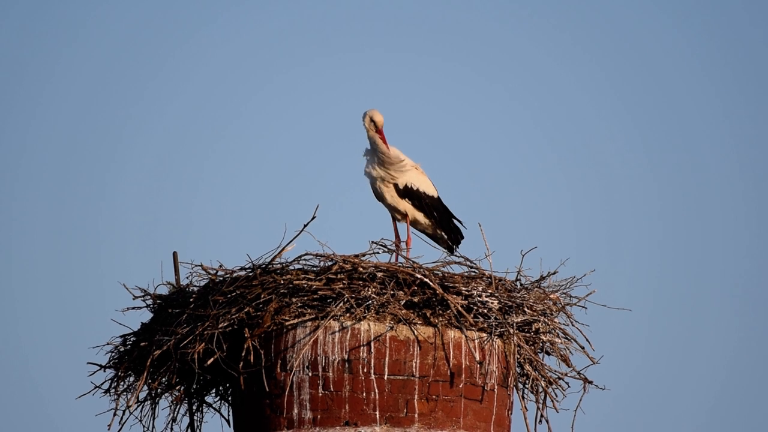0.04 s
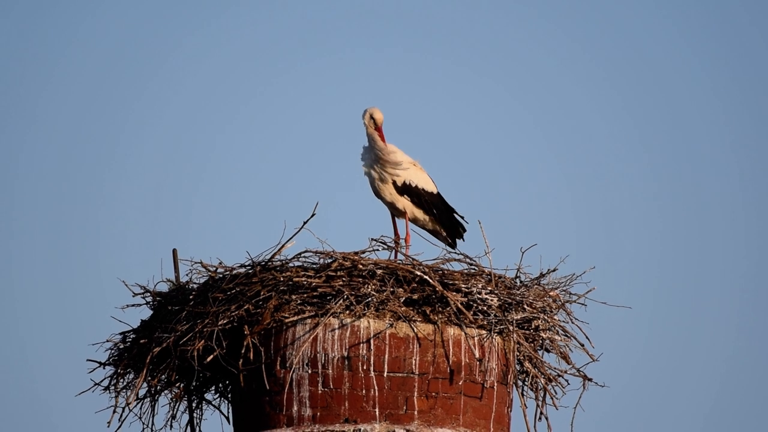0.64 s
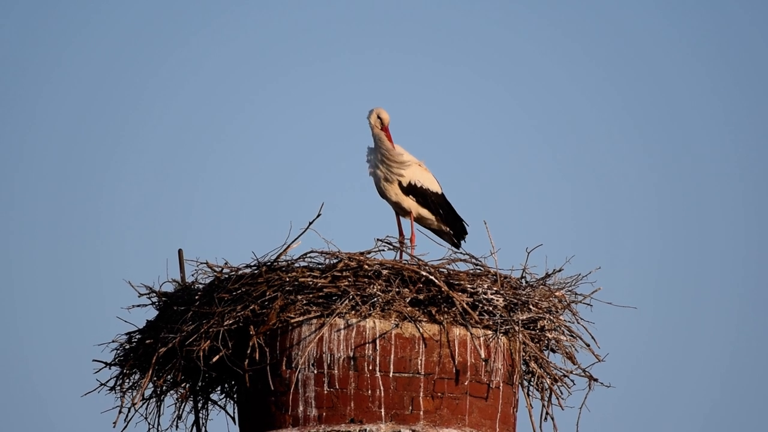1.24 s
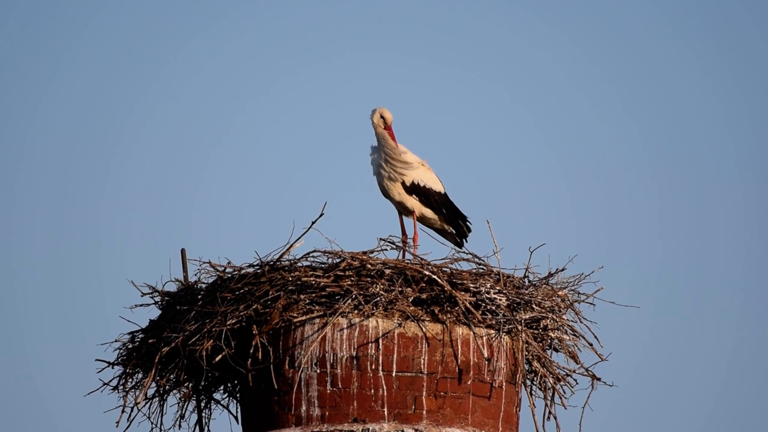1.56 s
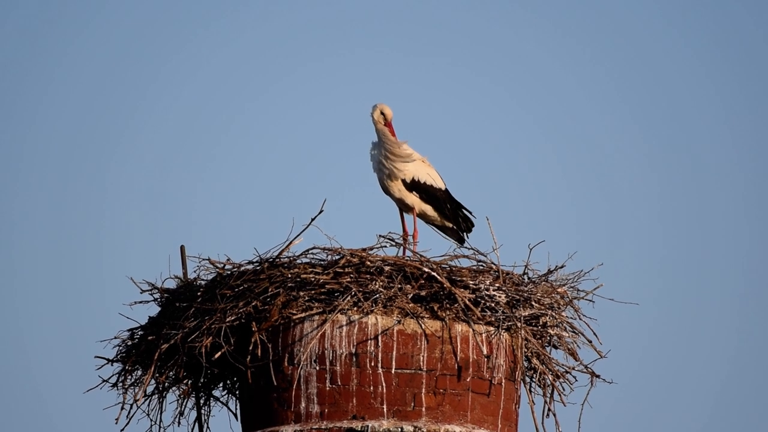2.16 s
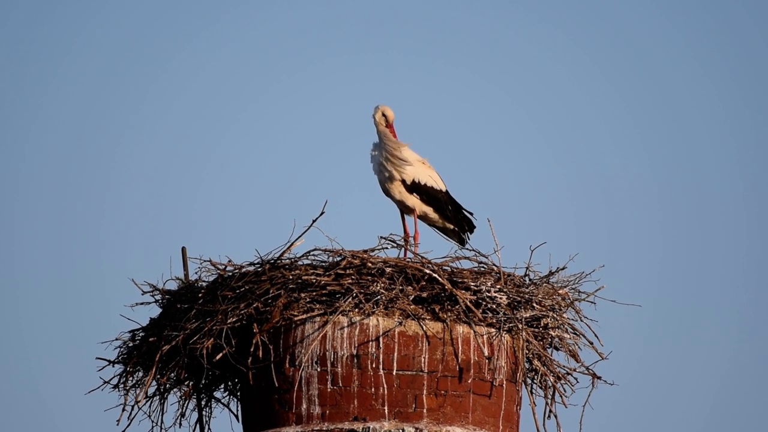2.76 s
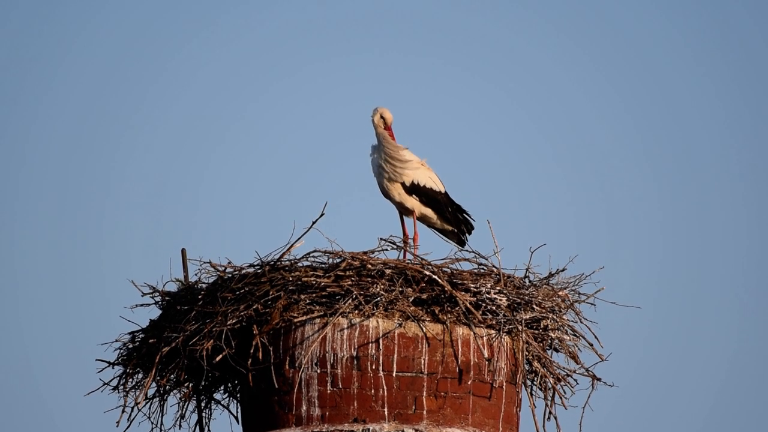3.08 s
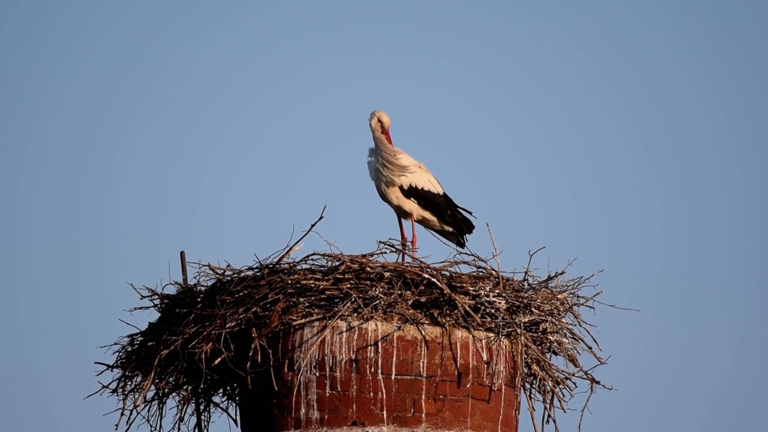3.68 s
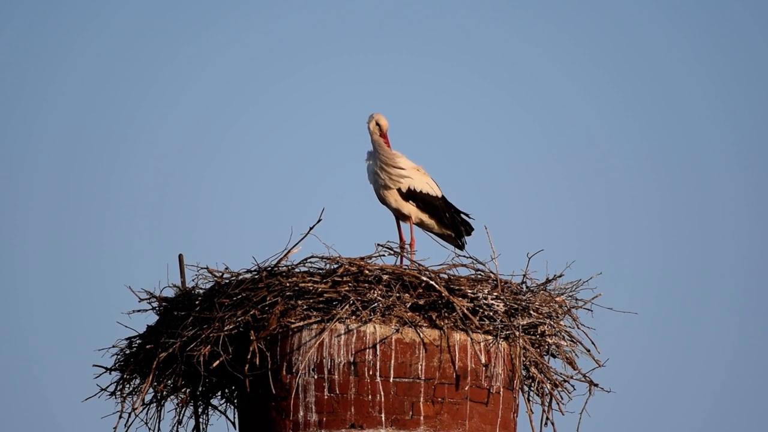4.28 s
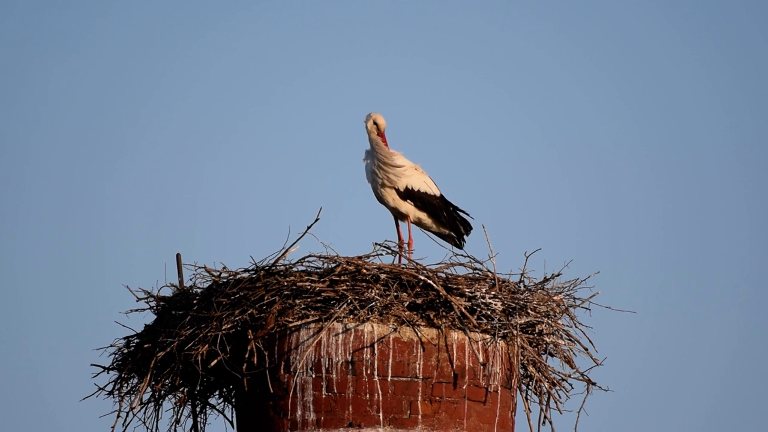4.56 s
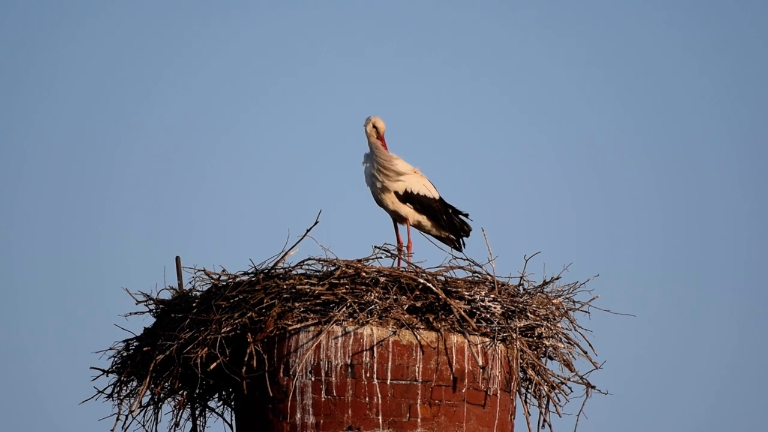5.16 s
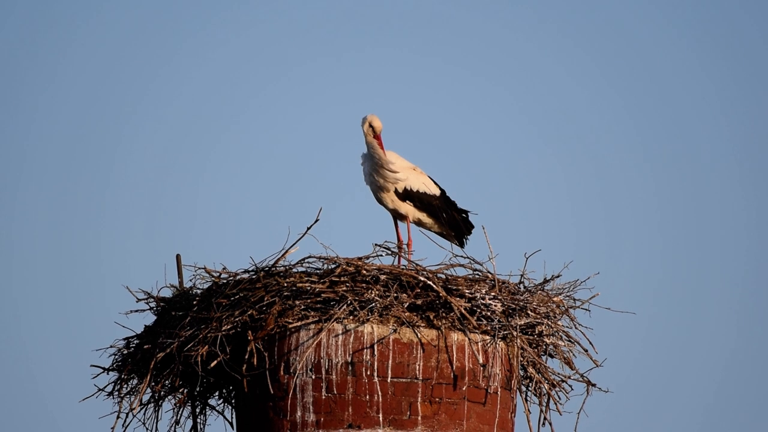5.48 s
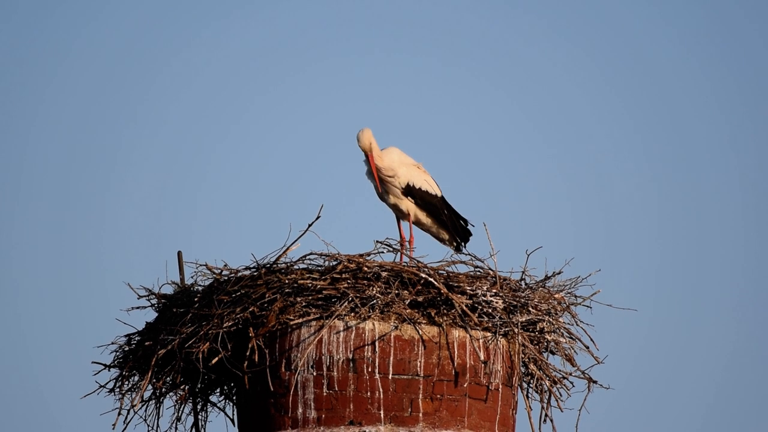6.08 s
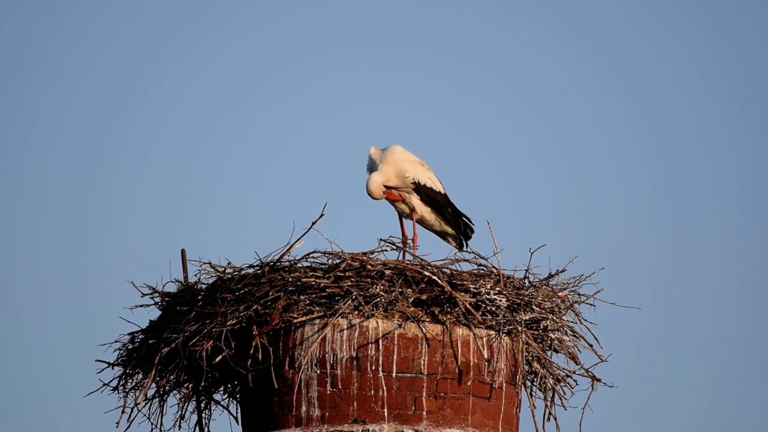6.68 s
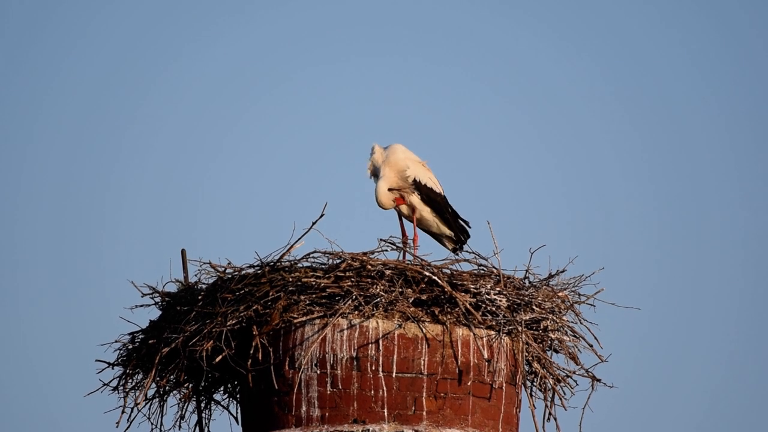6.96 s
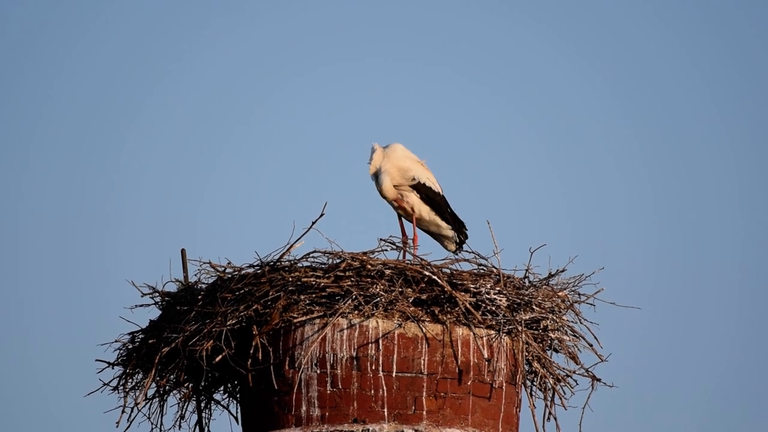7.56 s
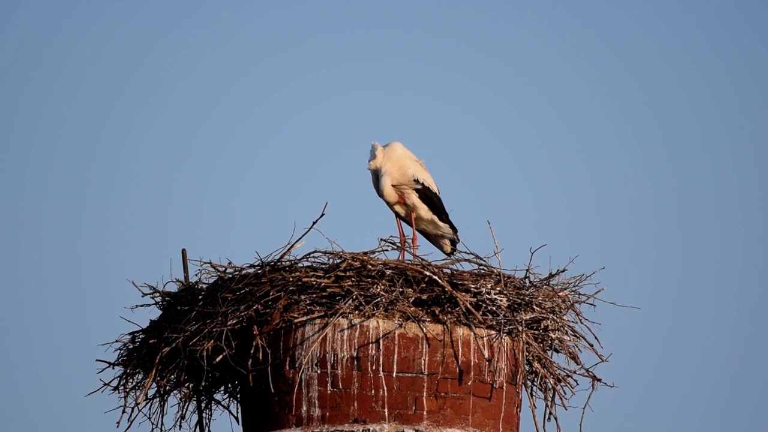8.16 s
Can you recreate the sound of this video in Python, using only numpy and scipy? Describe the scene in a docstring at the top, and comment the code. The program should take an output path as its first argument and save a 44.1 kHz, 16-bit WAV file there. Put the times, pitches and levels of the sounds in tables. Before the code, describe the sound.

Lumpy wind rumble hits the microphone outdoors and dies away as cars swell on a far-off road.

```python
"""Open air on a breezy day, heard from a stereo camera that stands still.
Gusts buffet the microphone in lumpy flutters and die away; the hardest eddies overload it.
Tyres roar on a distant road, swelling as cars go by. Close up, cloth rustles, ticks and squeaks once
as its fibres catch and slip. Leaves sigh in the breeze and a small bird whistles faintly,
over the thin hiss and whine of the camera's electronics."""
import sys
import numpy as np
from scipy import signal
from scipy.fft import rfft, irfft
from scipy.io import wavfile
from scipy.ndimage import uniform_filter1d

SR = 44100
rng = np.random.default_rng(int(sys.argv[2]) if len(sys.argv) > 2 else 0)


def output_pcm(signal):
    """Save a mono or channel-first signal as 16-bit PCM at the path in sys.argv[1].

    Samples are clipped to [-1, 1] before scaling.
    """
    pcm = np.clip(np.atleast_2d(signal).T, -1, 1) * 32767
    wavfile.write(sys.argv[1], SR, np.round(pcm).astype(np.int16))


N = 371763
T = np.arange(N) / SR
ALL_HZ = np.fft.rfftfreq(N, 1 / SR)
FRAME, HOP = 512, 128  # samples, for the moving filters
FRAME_S = np.arange(N // HOP + 3)[:, None] * HOP / SR
BIN_HZ = np.fft.rfftfreq(FRAME, 1 / SR)

# Gusts at the microphone. Each row: peak time in seconds, strength in dB, rise and fall in seconds.
WIND_GUSTS = [(.11, -36, 0.076, 0.15), (.313, -27.5, 0.054, .015), (.368, -21, 0.046, 0.12),
              (.76, -27.5, 0.094, 0.13), (0.819, -15, 0.036, 0.092), (0.916, -18, 0.047, 0.11),
              (1.03, -29.5, .05, 0.062), (1.3, -44, 0.28, 0.23), (1.73, -34.5, .21, 0.29),
              (2.0, -35, 0.076, 0.21), (2.25, -34.5, 0.15, 0.36), (2.598, -38.5, 0.036, .03),
              (2.72, -29, 0.047, 0.036), (2.97, -45.5, .05, 0.14), (3.52, -36.5, 0.065, 0.12),
              (3.66, -29.5, 0.16, .11), (4.075, -26, 0.091, 0.1), (4.2, -34, 0.04, 0.023),
              (4.39, -28, 0.11, .12), (4.585, -33, 0.052, 0.023), (4.82, -38.5, 0.66, 0.75),
              (5.1, -37.5, 0.19, 0.19), (5.43, -40.5, 0.18, 0.28)]
# The hardest eddies. Each row: time in seconds, relative level in dB, centre in Hz.
HARD_EDDIES = [(0.314, -12, 179), (.322, -5.5, 424), (.355, -10, 605), (0.368, -7, 870), (.805, 1.5, 930),
               (.808, 3.5, 660), (.830, 7.5, 883), (0.8481, 1.5, 566), (0.927, -8, 620), (0.964, -6, 358),
               (1.889, -19.5, 264), (2.244, -17, 384), (2.6, -25, 160), (2.725, -8, 590),
               (3.533, -17.5, 487), (3.656, -15.5, 403), (4.062, -5.5, 445), (4.0745, -7.5, 644),
               (4.317, -17.5, 550), (4.351, -12, 636), (4.426, -7.5, 620), (4.923, -19.5, 259),
               (5.29, -21, 403)]
# Colour of the buffeting. Each row: frequency in Hz, relative level in dB.
BUFFET_COLOUR = [(20, -23), (45, -9), (90, -1.5), (140, 1.5), (200, 0.5), (330, -4.5), (700, -1),
                 (1500, -6), (4000, -41)]
# Swells of the road, as cars pass or the breeze carries them. Each row: peak time in seconds,
# level in dB, half width in seconds, drive of the body EQ in dB, drive of the treble EQ in dB.
ROAD_SWELLS = [(0.044, -35, 0.093, 2.5, -4), (0.477, -37.5, 0.81, 1.5, 8), (1.083, -32, .11, -7, 2),
               (1.735, -37, 0.49, -1.5, 3), (2.46, -40.5, .5, -8.5, -4.5), (6.193, -29.5, 0.79, -5.5, -5),
               (7, -33, 0.58, 5, 5), (7.64, -35, 0.32, 8.5, 4.5), (8.35, -33, 0.66, 2.5, 2)]
# Colour of the distant tyres. Each row: frequency in Hz, relative level in dB.
TYRE_COLOUR = [(20, -62), (200, -24.5), (300, -17.5), (450, -10), (700, -5), (1000, 1), (1350, -1.5),
               (1800, -6.5), (2400, -15.5), (3500, -25), (5000, -33.5), (7000, -44), (16000, -60)]
# Colour of the rumble under the road. Each row: frequency in Hz, relative level in dB.
RUMBLE_COLOUR = [(10, 7), (30, -26), (60, 3), (100, 1.5), (170, -1.5), (280, -9), (600, -16), (2000, -58)]
# Strokes of cloth. Each row: peak time in seconds, relative level in dB, half width in seconds.
CLOTH_STROKES = [(3.252, -51.5, .026), (3.305, -54, .012), (3.462, -60, 0.058), (3.615, -59, 0.042),
                 (3.71, -46.5, 0.015), (3.765, -51.5, 0.043), (3.86, -59.5, .04), (3.974, -55.5, .03),
                 (4.25, -53, 0.02), (4.523, -59, 0.036), (4.67, -60, 0.024), (4.83, -56.5, 0.053),
                 (4.905, -51.5, 0.017), (4.977, -57, 0.016), (5.033, -53.5, 0.013), (6.237, -58, 0.03)]
# Colour of rubbing fibres. Each row: frequency in Hz, relative level in dB.
CLOTH_COLOUR = [(200, -24), (1200, -9), (3000, 12), (4300, 7), (6000, 2.5), (9500, 0.5), (12000, -4.5),
                (16000, -18)]
# Tiny clicks. Each row: time in seconds, relative level in dB, half width in seconds,
# low and high band edges in Hz.
CLOTH_TICKS = [(2.579, -51, 0.001, 2500, 10500), (4.525, -56, .002, 5000, 8500),
               (4.551, -59, .0015, 5000, 12000), (5.897, -51, 0.00081, 8000, 11500)]
# Sighs of leaves. Each row: peak time in seconds, relative level in dB, half width in seconds,
# centre in Hz.
LEAF_SIGHS = [(.53, -66.5, .16, 9000), (1.077, -68.5, 0.13, 8400), (2.25, -74, .1, 8500),
              (2.56, -66, .07, 3400), (2.98, -73, .05, 10500), (5.676, -63, 0.035, 5500),
              (7.038, -66.5, .14, 9000), (7.598, -72, 0.11, 8500)]
# Calls of a small bird. Each row: peak time in seconds, level in dB, pitch in Hz.
BIRD_CALLS = [(5.525, -65, 7250), (6.19, -68, 7200)]
# Colour of the hiss of leaves and microphone. Each row: frequency in Hz, relative level in dB.
HISS_COLOUR = [(20, -16), (2000, -4), (5000, 2.5), (8000, 1.5), (10500, -1.5), (13000, -7), (16000, -13)]
# Stereo image of diffuse sound. Each row: frequency in Hz, left-right likeness from 0 (wide) to 1 (mono).
STEREO_LIKENESS = [(30, 1), (300, 0.99), (800, 0.99), (1600, .98), (2500, 0.85), (4000, 0.84), (6000, 0.38),
                   (10000, 0.17), (15000, .05)]


def wind(flow_db=5.5, eddy_db=-1, lee_flutter_db=-11, lee_hz=420):
    """The right port faces the wind; the left, in the lee, gets it later and duller, plus its own flutter."""
    strength_db = gust_strength()
    windward = gain_of(flow_db) * turbulence(strength_db) + gain_of(eddy_db) * eddies()
    sheltered = windward + gain_of(flow_db + lee_flutter_db) * turbulence(strength_db)
    return np.array([filtered(sheltered, 1 / (1 + 1j * ALL_HZ / lee_hz)), windward])


def gust_strength(lull_db=-70, drop_db=12.5, roundness=1.34, flutter_db=1.0, flutter_hz=23):
    """Wind strength in dB: each gust builds and dies away over a light breeze, and the flow flutters."""
    power = gain_of(lull_db) ** 2
    for s, db, rise, fall in WIND_GUSTS:
        away = np.maximum((s - T) / rise, (T - s) / fall)
        power = power + gain_of(db - drop_db * np.minimum(away, 10) ** roundness) ** 2
    return 10 * np.log10(power) + flutter_db * wander(flutter_hz)


def turbulence(strength_db, lumpy_db=4.0, lump_hz=110, corner_hz=900, strong_db=-22, brightening=0.59):
    """Pressure comes in lumps; faster wind carries smaller eddies, so its whole band moves up in pitch."""
    lumps = evened(rng.standard_normal(N) * gain_of(lumpy_db * wander(lump_hz)))
    flow = evened(filtered(lumps, gain_of(curve_at(BUFFET_COLOUR, ALL_HZ)))) * gain_of(strength_db)
    excess_db = np.interp(FRAME_S, T, strength_db) - strong_db
    ratio = BIN_HZ / (corner_hz * gain_of(brightening * excess_db))
    low_cut = ratio / np.hypot(ratio, 0.29)
    return swept(flow, low_cut / np.hypot(1, ratio ** 2.3))


def eddies(half_cycles=0.36):
    """Each hard eddy is one short push and pull of pressure."""
    out = np.zeros(N)
    phases = rng.uniform(0, 2 * np.pi, len(HARD_EDDIES))
    for (s, db, hz), phase in zip(HARD_EDDIES, phases):
        out += gain_of(db) * bump(s, half_cycles / hz) * np.cos(2 * np.pi * hz * (T - s) + phase)
    return out


def road(rumble_db=-54.5, waver_db=0.49, shimmer_db=1.0):
    """Tyre roar, dulled by distance and wavering in the moving air, over a steady rumble."""
    level_db, body_db, treble_db = traffic(FRAME_S)
    body_eq = curve_at([(250, -0.25), (450, 0.82), (950, 0.72), (1400, 0.096), (2400, -0.071)], BIN_HZ)
    treble_eq = curve_at([(1600, 0.0056), (3000, 1)], BIN_HZ)
    tone_db = body_db * body_eq + treble_db * treble_eq
    # Soft random patches in time and frequency make the roar shimmer.
    patches = uniform_filter1d(rng.standard_normal(tone_db.shape), size=40, axis=0)
    patches = evened(uniform_filter1d(patches, size=4, axis=1))
    tyres = stereo_noise(TYRE_COLOUR, curve_at(STEREO_LIKENESS, ALL_HZ))
    roar = swept(tyres, gain_of(level_db + tone_db + shimmer_db * patches))
    roar *= gain_of(waver_db * wander(hz=15))
    return roar + gain_of(rumble_db) * stereo_noise(RUMBLE_COLOUR, likeness=0.98)


def traffic(t, steady_db=-38.5):
    """Swells add in power to the steady traffic farther off; body and treble are mixed by each swell's share of
    the power."""
    s, db, half, body_db, treble_db = np.transpose(ROAD_SWELLS)
    power = (gain_of(db) / (1 + ((t - s) / half) ** 2)) ** 2
    total = power.sum(1) + gain_of(steady_db) ** 2
    return np.array([10 * np.log10(total), power @ body_db / total, power @ treble_db / total])[..., None]


def cloth(grain_db=1.5, grain_hz=250, bright_hz=7500, firm_db=-48, brightening=0.27):
    """Fibres catch and slip under each stroke; a firmer stroke is brighter."""
    strokes = np.sqrt(sum((gain_of(db) * bump(s, half)) ** 2 for s, db, half in CLOTH_STROKES))
    fibres = evened(stereo_noise(CLOTH_COLOUR, likeness=0.77) * gain_of(grain_db * wander(grain_hz)))
    dull = filtered(fibres, 1 / (1 + (ALL_HZ / bright_hz) ** 4))
    brightness = (strokes / gain_of(firm_db)) ** brightening
    return strokes * (dull + (fibres - dull) * brightness)


def squeak(peak_s=3.26, db=-30, half_s=.006, hz=1460):
    """For a moment the slipping fibres fall into step: a rough tone with a falling pitch."""
    pitch_hz = hz * (1 - 9 * np.clip(T - peak_s, -.03, .03) + .025 * wander(hz=400))
    turns = np.cumsum(pitch_hz) / SR
    tone = sum(gain_of(partial_db) * np.sin(2 * np.pi * harmonic * turns)
               for harmonic, partial_db in enumerate([0, -15, -15], start=1))
    return gain_of(db) * bump(peak_s, half_s) * tone


def ticks():
    """Dry little clicks, each a pinch of noise in its own treble band."""
    out = np.zeros(N)
    for s, db, half, low_hz, high_hz in CLOTH_TICKS:
        slope = (ALL_HZ / low_hz) ** 6
        band = slope / np.hypot(1, slope) / np.hypot(1, (ALL_HZ / high_hz) ** 6)
        out += gain_of(db) * bump(s, half) * evened(filtered(rng.standard_normal(N), band))
    return out


def leaves(octaves=0.36):
    """The breeze stirs the leaves: each sigh is a smooth swell of hiss in its own band."""
    hiss = stereo_noise(HISS_COLOUR, likeness=0.85)
    out = np.zeros((2, N))
    for s, db, half, hz in LEAF_SIGHS:
        band = np.exp(-(np.log2((ALL_HZ + 1) / hz) / octaves) ** 2 / 2)
        out += gain_of(db) * bump(s, half) * evened(filtered(hiss, band))
    return out


def bird(half_s=.012, fall_hz_per_s=20000):
    """Each call is a thin, short whistle that slides down."""
    out = np.zeros(N)
    for s, db, hz in BIRD_CALLS:
        turns = hz * (T - s) - fall_hz_per_s * (T - s) ** 2 / 2
        out += gain_of(db) * bump(s, half_s) * np.sin(2 * np.pi * turns)
    return out


def electronics(hiss_db=-67.5, whine_db=-86, whine_hz=7656):
    """The noise floor: the microphone's steady hiss and the camera's thin whine."""
    hiss = gain_of(hiss_db) * stereo_noise(HISS_COLOUR, curve_at(STEREO_LIKENESS, ALL_HZ))
    return hiss + gain_of(whine_db) * np.sqrt(2) * np.sin(2 * np.pi * whine_hz * T)


def gain_of(db):
    """Decibels to amplitude."""
    return 10 ** (np.asarray(db) / 20)


def evened(x):
    """Scaled to rms 1."""
    return x / np.sqrt(np.mean(x ** 2) + 1e-20)


def curve_at(points, hz):
    """A curve's value on a log-frequency axis."""
    point_hz, value = np.transpose(points)
    return np.interp(np.log(hz + 1), np.log(point_hz + 1), value)


def filtered(x, response):
    """A static EQ."""
    return irfft(rfft(x) * response, N)


def swept(x, gain):
    """A moving EQ, with one curve per frame."""
    frames = signal.stft(x, nperseg=FRAME, noverlap=FRAME - HOP)[2]
    shaped = frames * gain[:frames.shape[-1]].T
    return signal.istft(shaped, nperseg=FRAME, noverlap=FRAME - HOP)[1][..., :N]


def wander(hz):
    """Smooth random drift of rms 1, up to about the given rate."""
    return evened(filtered(rng.standard_normal(N), np.exp(-(ALL_HZ / hz) ** 2)))


def stereo_noise(colour, likeness):
    """Coloured mid-side noise; more likeness narrows the image."""
    mid, side = rfft(rng.standard_normal((2, N)))
    channels = np.sqrt(1 + likeness) * mid + np.array([[1], [-1]]) * np.sqrt(1 - likeness) * side
    return evened(irfft(channels * gain_of(curve_at(colour, ALL_HZ)), N))


def bump(s, half):
    """A bell-shaped swell at time s; its half width is one standard deviation."""
    return np.exp(-np.minimum(((T - s) / half) ** 2 / 2, 50))


def scene():
    """Wind up front, the far road and a bird behind, and small near sounds a touch to the right."""
    near = cloth() + squeak() + ticks() + leaves() + electronics()
    return wind() + road() * gain_of([[-.15], [.15]]) + bird() + near * gain_of([[-.5], [.5]])


def record(dry):
    """The hardest eddies clip at full scale; the ends are softened and the very top is cut."""
    clipped = np.clip(dry, -1, 1) * signal.windows.tukey(N, .0006)
    high_cut = signal.firwin(511, cutoff=15750, window=("kaiser", 9), fs=SR)
    return signal.oaconvolve(clipped, high_cut[None], "same")


dry = scene()
out = record(dry)
output_pcm(out)
```